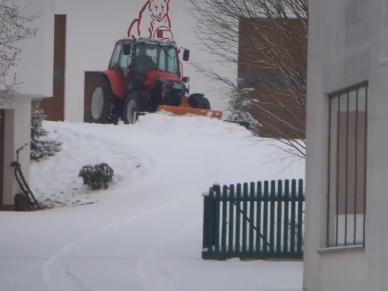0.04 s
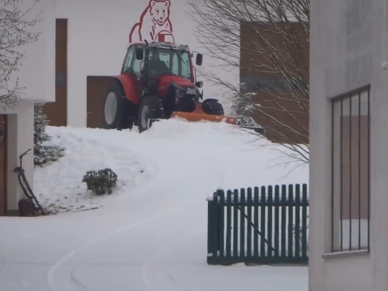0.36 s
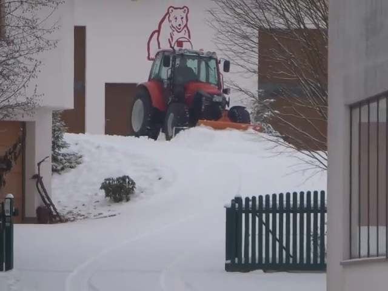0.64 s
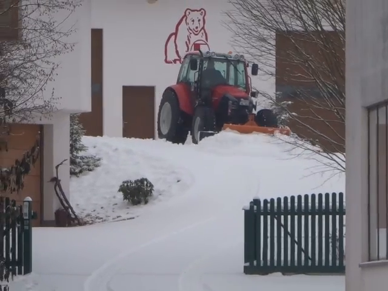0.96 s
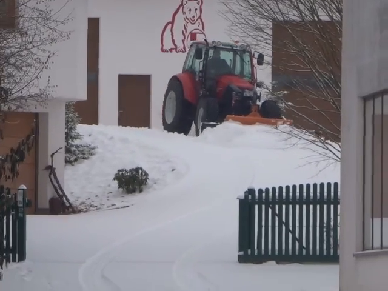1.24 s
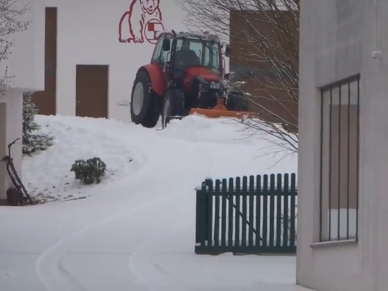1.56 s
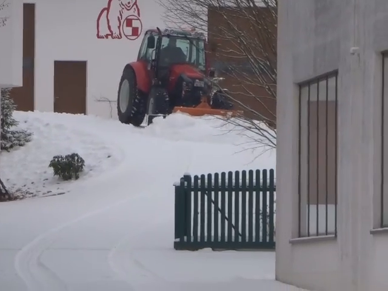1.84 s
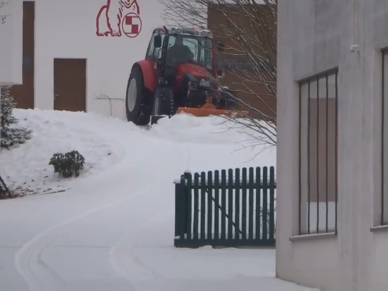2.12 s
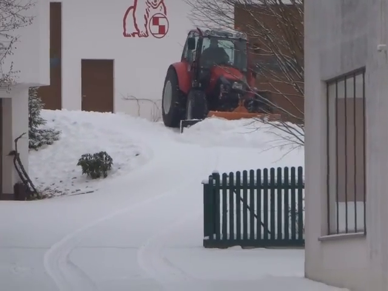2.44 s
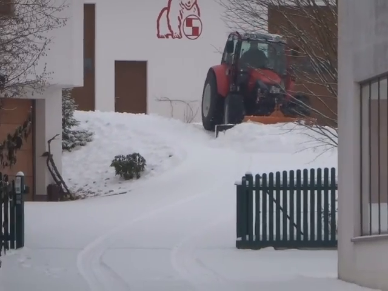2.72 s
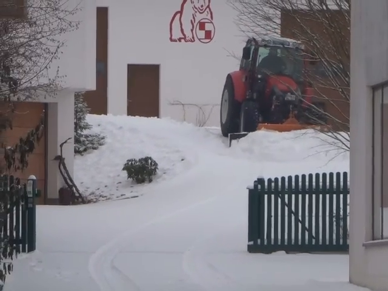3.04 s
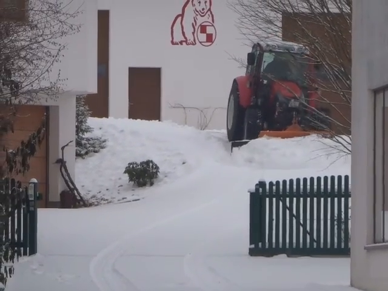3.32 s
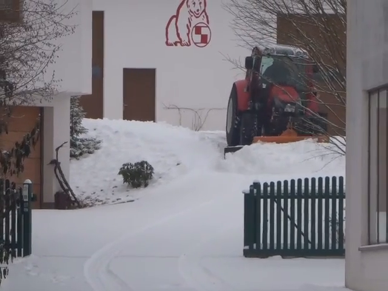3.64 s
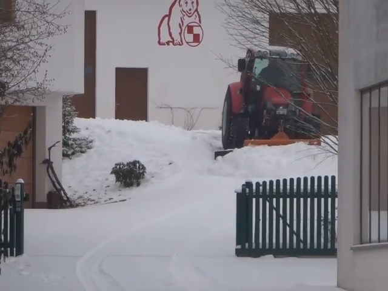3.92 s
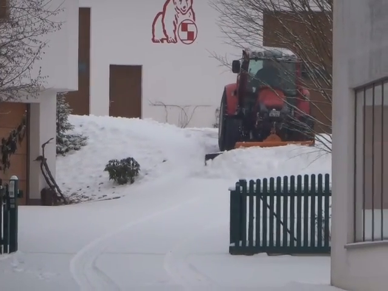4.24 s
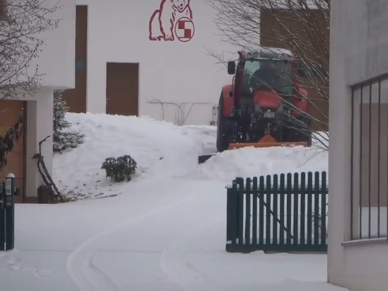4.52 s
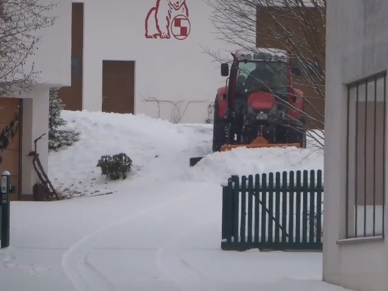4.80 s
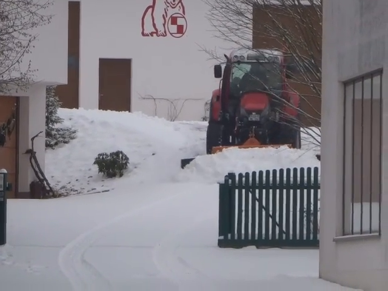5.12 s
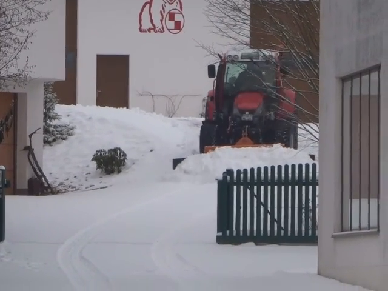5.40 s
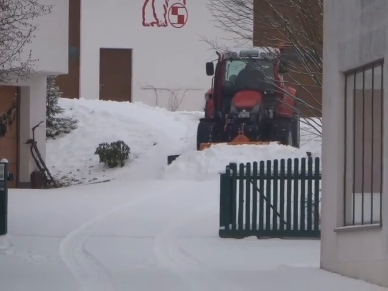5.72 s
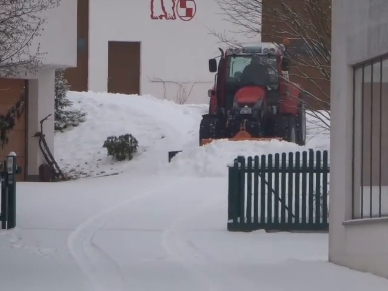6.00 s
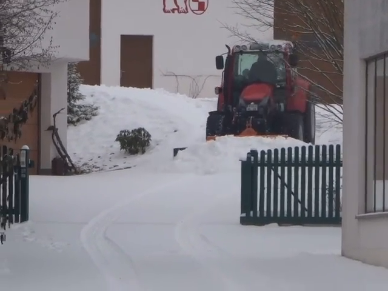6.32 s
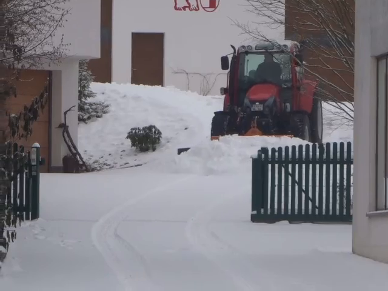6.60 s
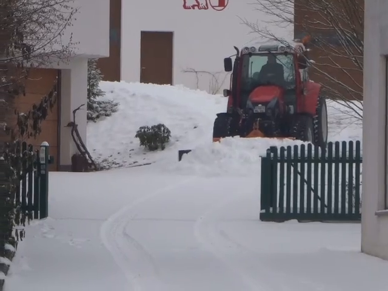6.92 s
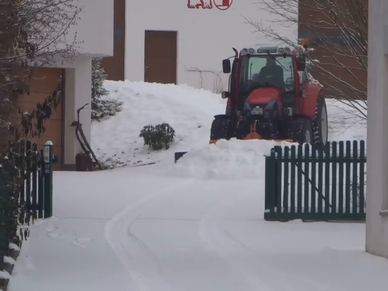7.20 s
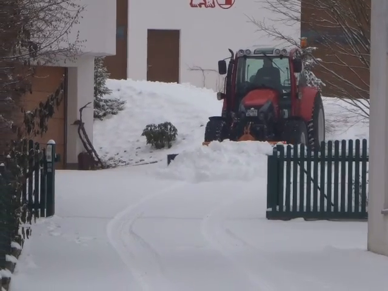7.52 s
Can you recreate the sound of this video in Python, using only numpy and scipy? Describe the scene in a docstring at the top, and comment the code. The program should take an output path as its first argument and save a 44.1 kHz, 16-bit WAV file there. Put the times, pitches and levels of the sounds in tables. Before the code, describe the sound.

A tractor pushes snow along a driveway with a steel blade, its diesel running slowly underneath. The scraping starts loud and bright, with crunching, hissing and a dull tumble of snow. Wind puffs begin to thump on the microphone and frozen lumps knock on the blade. The edge rasps on the paving in a second surge, then the scraping drops to a quieter rush with faint squeaks and a brief exhaust boom.

```python
"""A tractor pushes snow down a driveway with a steel blade; its diesel runs slowly underneath.
0-2.5 s: loud, bright scraping. The edge sticks and slips; the heap groans, crunches, tumbles at 1.2 s.
From 2.5 s: wind puffs thump on the microphone and frozen lumps knock on the blade.
3.2-4.5 s: the edge bites through to the paving and the scraping surges once more, then eases.
Faint steel squeaks at 5 s, a brief exhaust boom at 6.5 s, a last squeak at 7.2 s."""
import sys
import numpy as np
from scipy import signal
from scipy.fft import rfft, irfft, next_fast_len
from scipy.io import wavfile
from scipy.ndimage import uniform_filter1d, map_coordinates

SR = 44100
rng = np.random.default_rng(int(sys.argv[2]) if len(sys.argv) > 2 else 0)


def store_pcm(level_fs):
    """Save levels as 16-bit WAV."""
    pcm = np.round(np.clip(level_fs, -1, 1) * 32767).astype(np.int16)
    wavfile.write(sys.argv[1], SR, np.atleast_2d(pcm).T)


N = 341775

# Blade at work: (time [s], grind level [dB], loose-snow hiss level [dB])
BLADE_LEVELS = [(0.1, -24.9, -25.5), (0.4, -20.5, -24.5), (0.75, -21.5, -21.5), (1.03, -20.5, -22),
                (1.2, -20.5, -24.5), (1.5, -19.5, -22.5), (2.0, -18.5, -23.0), (2.2, -20, -26.5),
                (2.7, -19, -30.5), (3.05, -24, -35.8), (3.35, -27, -36.5), (3.75, -22, -34.5),
                (4.3, -23, -33.5), (4.75, -33, -40.5), (5.5, -33, -39), (6.3, -34.6, -42.5),
                (7.1, -36.0, -43.5), (7.45, -37.0, -45.4), (7.75, -37.5, -45.1)]
# Fine spray: (time [s], level relative to hiss [dB])
SPRAY_OVER_HISS = [(.4, -9.5), (1.2, -6.5), (2, -7), (3.3, -10.5), (3.85, -13.5), (4.15, -8), (6.6, -8.5),
                   (7.1, -5), (7.5, -13)]
# Scrape brightness: (time [s], upper over lower band [dB])
GRIND_TILT = [(.4, -1), (.8, 1.5), (2.2, 1.5), (3.35, -3), (3.85, 5), (4.3, 6.5), (6.6, 1.5), (7.5, -3.5)]
RASP_TILT = [(.4, -10), (.75, 2.5), (1.2, -8), (1.7, -2), (2.2, -7), (3.1, 8), (4.3, -2.5), (6.1, 13),
             (7.75, 2)]
# Scrape spectra: (frequency [Hz], density [dB])
GROAN_SPECTRUM = [(60, -26), (170, -16), (255, -6.5), (325, 0.5), (400, -3), (490, -7.5), (700, -12),
                  (1500, -48)]
GRIND_SPECTRUM = [(250, -36), (460, -5), (560, -5.5), (680, -1.5), (860, 2), (1250, 0), (1550, -2),
                  (1850, -5.5), (2600, -19), (6000, -58)]
RASP_SPECTRUM = [(900, -64), (1550, -7.5), (1950, 0), (2250, 0), (2650, -4), (3050, -12), (4200, -40),
                 (9000, -60)]
HISS_SPECTRUM = [(1800, -41), (2700, -3.5), (3300, 2.5), (4000, 2), (4700, -3.5), (5600, -3.5),
                 (6600, -15.5), (8000, -11.5), (11000, -45)]
SPRAY_SPECTRUM = [(4000, -25), (6000, 5), (7200, 1), (8400, -0.5), (9300, -4.5), (10200, -5.5),
                  (11200, -14.5)]
TUMBLE_SPECTRUM = [(70, -25), (125, -5), (175, 0), (280, 2.5), (420, 2.5), (570, 2), (750, -5), (1500, -45)]
# Steel blade resonances: (frequency [Hz], width [Hz], level [dB])
BLADE_MODES = [(680, 134, -5.5), (883, 210, -28), (1120, 57, -31), (1620, 420, -3), (2060, 780, -18)]
# Edge on paving: (start [s], end [s], rasp boost [dB])
EDGE_BITES = [(0.075, 0.42, 5.5), (3.21, 3.503, 4.5), (3.5, 4.447, 8), (4.7, 5.65, 2), (7.149, 7.8, 3)]
# Heap shoved into a tumble: (time [s], level [dB], half length [s])
HEAP_SHOVES = [(1.23, -23, 0.3), (3.219, -34, 0.11)]
# Lumps caught by the edge: (time [s], relative level [dB], crack offset [dB])
LUMP_HITS = [(2.845, -10, -21), (2.876, -24, -16), (3.217, -3, -28), (3.874, -5, -24), (4.042, -7, -26),
             (4.366, -9, -20), (5.752, -12, -22)]
# Steel squeaks: (time [s], level [dB], half length [s])
STEEL_SQUEAKS = [(5.02, -52, 0.038), (7.24, -57, 0.038)]
# Diesel: (time [s], firing rate [Hz], relative level [dB])
ENGINE_RUN = [(0, 40, -40), (.8, 64, -39.5), (1.3, 36, -34), (2, 38, -39.5), (3.2, 34.6, -34.5),
              (4.5, 43.3, -46.5), (6.3, 37, -44), (6.65, 37, -44.5), (7, 41, -49), (7.75, 33.5, -45)]
# Exhaust drone: (multiple of firing rate, level [dB])
EXHAUST_HARMONICS = [(1, -3), (2, -1.5), (3, 0), (4, -1.5), (5, -10.5), (6, -12)]
# Exhaust boom at twice the firing rate: (time [s], relative level [dB])
EXHAUST_BOOM = [(6.49, -10), (6.55, 16), (6.75, 13), (6.85, -8)]
# Engine panel resonances: (frequency [Hz], width [Hz], level [dB])
PANEL_MODES = [(560, 69, -2), (675, 75, -3.5), (1110, 160, 0), (1276, 98, -6), (1544, 240, -2.5),
               (2200, 260, -6)]
# Eddies on the microphone: (time [s], level [dB], hold [s], pitch [Hz])
EDDIES = [(2.556, -27.5, 0.011, 120), (2.831, -25.5, 0.033, 105), (3.129, -22, 0.0099, 114),
          (3.361, -23, 0.012, 120), (3.446, -21.5, .005, 105), (3.625, -29.5, 0.0039, 80),
          (3.708, -24.5, 0.0037, 80), (3.886, -27, 0.08, 124.2), (3.998, -21, 0.057, 131.8),
          (4.132, -22, 0.0086, 87), (4.168, -20.5, 0.022, 114), (4.226, -18.5, .007, 71.8),
          (4.945, -17.5, .008, 90.5), (4.987, -22, 0.033, 138), (5.182, -21.5, 0.018, 145.5),
          (6.134, -26, 0.023, 145), (6.793, -25, 0.017, 119.7), (6.955, -21, 0.023, 145),
          (7.152, -18.5, .001, 170), (7.233, -23, 0.007, 109.8)]
# Slow wind swells: (time [s], level [dB], half length [s])
WIND_GUSTS = [(1.22, -37, .36), (2.2, -39, .08), (2.8, -37.5, 0.29)]
# Wind rumble: (frequency [Hz], density [dB])
WIND_SPECTRUM = [(15, -22), (35, 0.5), (65, -6.5), (110, 3.5), (165, -0.5), (230, -13), (400, -14),
                 (900, -64)]
# Echo off packed snow: (time [s], strength [0-1])
GROUND_ECHO = [(2.9, 0.38), (3.35, 0.36), (3.8, 0.46), (4.3, 0.4), (4.8, 0.13)]
# Packed snow shapes the finest spray: (time [s], top-band gain [dB])
TOP_GAIN = [(.42, -13), (.9, -3), (1.3, 5), (2.2, 5.5), (4, 2), (5.2, 5), (7.5, 1)]
# Reach of that gain: (frequency [Hz], share [0-1])
TOP_SHARE = [(8000, 0.012), (9200, 0.55), (11000, 1)]
# Tractor direction: (time [s], treble L-R [dB])
TRACTOR_PAN = [(0.95, -3.5), (1.45, 3), (2.15, 6), (5.85, 7), (7.3, 5.5)]
# Camera body shadow: (frequency [Hz], pan multiplier)
BODY_SHADOW = [(200, 0.14), (450, 0.094), (1000, 0.58), (2200, 1), (4500, 1.12), (9000, 2.02)]
# Duller left microphone port: (frequency [Hz], L-R [dB])
PORT_BALANCE = [(4500, -0.5), (8000, -6)]
# Stereo likeness of the tractor: (frequency [Hz], L-R correlation [0-1])
COHERENCE = [(100, 1), (400, 0.96), (1000, 0.94), (2200, 0.91), (4500, 0.9), (9000, 0.86)]


def plough(groan_follows_grind=0.27, unload_db_per_db=0.18, settle_s=0.85):
    """The edge sticks and slips; each slip crushes snow in all bands at once."""
    grind_db, hiss_db = curves(BLADE_LEVELS)
    fine_db, = curves(SPRAY_OVER_HISS)
    bite_db = edge_bite()
    groan_db = hiss_db + groan_follows_grind * (grind_db - hiss_db) - 5 - unload_db_per_db * bite_db
    rasp_db = hiss_db + 1.9 + bite_db
    groan_tilt_db = -2.5 + 12 * np.exp(-clock() / settle_s)  # starts high, settles lower
    grind_tilt_db, = curves(GRIND_TILT)
    rasp_tilt_db, = curves(RASP_TILT)
    hiss_tilt_db = 0.76 * (fine_db + 8)  # more spray, finer hiss
    slip = unit(0.76 * wobble(20) + 1.1 * wobble(60) + 0.3 * wobble(190))
    groan = on_blade(GROAN_SPECTRUM, crunch(rate_hz=500, spread_db=2, share=0.28))
    groan = tilted(groan, groan_tilt_db, pivot_hz=290)
    grind = on_blade(GRIND_SPECTRUM, crunch(rate_hz=1200, spread_db=2, share=0.29), ring=0.82)
    grind = tilted(grind, grind_tilt_db, pivot_hz=1060)
    rasp = on_blade(RASP_SPECTRUM, crunch(rate_hz=1500, spread_db=2.5, share=0.33), ring=0.23)
    rasp = tilted(rasp, rasp_tilt_db, pivot_hz=2310)
    hiss = on_blade(HISS_SPECTRUM, crunch(rate_hz=2600, spread_db=1.5, share=0.16))
    hiss = tilted(hiss, hiss_tilt_db, pivot_hz=4300)
    spray = on_blade(SPRAY_SPECTRUM, crunch(rate_hz=4200, spread_db=2.5, share=0.44))
    tumble = on_blade(TUMBLE_SPECTRUM, crunch(rate_hz=300, spread_db=0.5, share=0.28))
    tumble *= swells(HEAP_SHOVES)
    heavy = amp(groan_db) * groan + amp(grind_db - 0.52) * grind + amp(rasp_db) * rasp + tumble
    loose = amp(hiss_db - 0.22) * hiss + amp(hiss_db + fine_db + 0.74 * wobble(45)) * spray
    return amp(0.48 * slip) * heavy + amp(0.68 * slip) * loose


def edge_bite(attack_s=0.19, release_s=0.29):
    """Rasp boost [dB]: the edge catches the paving, holds, lets go."""
    t = clock()
    return np.max([db * np.clip(np.minimum((t - start_s) / attack_s, 1 - (t - end_s) / release_s), 0, 1)
                   for start_s, end_s, db in EDGE_BITES], axis=0)


def crunch(rate_hz, spread_db, share):
    """Snow crystals break: uneven fractures carry a share of the power, a smooth rush the rest."""
    breaks = (rng.random((2, N)) < rate_hz / SR) * noise_pair() * amp(spread_db * noise_pair())
    return np.sqrt(share) * unit(breaks) + np.sqrt(1 - share) * noise_pair()


def on_blade(spectrum, excitation, ring=0.1):
    """Stereo excitation shaped by a spectrum and lifted at the blade's resonances."""
    colour = lambda hz: amp(along(spectrum, hz)) * (1 + ring * resonances(BLADE_MODES, hz))
    return stereo(excitation, colour, COHERENCE)


def crackle(rate_hz=35, decay_s=0.00052):
    """Bits of crust snap at random, following the hiss level."""
    _, hiss_db = curves(BLADE_LEVELS)
    snaps = (rng.random(N) < rate_hz / SR) * amp(2.1 * rng.standard_normal(N))
    bursts = signal.lfilter([1], [1, -np.exp(-1 / (decay_s * SR))], snaps)
    crust = on_blade([(900, -19), (2000, -18), (3200, -1), (5000, -2), (11000, -31)], noise_pair(), 0.2)
    return amp(hiss_db - 11) * unit(bursts * crust)


def lumps(rise_s=0.00055, knock_t60_s=0.035, crack_t60_s=0.017):
    """Frozen lumps knock on the blade and crack; snow damps the ring at once."""
    knock_gain, crack_gain = np.zeros(N), np.zeros(N)
    for at_s, db, crack_db in LUMP_HITS:
        age_s = clock() - at_s
        onset = np.clip(age_s / rise_s, 0, 1)
        knock_gain += onset * amp(db - 10 - 60 * abs(age_s) / knock_t60_s)
        crack_gain += onset * amp(db + crack_db - 16 - 60 * abs(age_s) / crack_t60_s)
    knock = on_blade([(300, -38), (900, 14), (2200, 13), (5000, -20), (11000, -67)], noise_pair(), 1.9)
    crack = on_blade([(1000, -25), (3200, 13), (6000, -9), (11000, -29)], noise_pair())
    return knock_gain * knock + crack_gain * crack


def squeaks(pitch_hz=8950, width_hz=130):
    """Rubbing steel: a faint, narrow whistle."""
    band = lambda hz: np.exp(-((hz - pitch_hz) / width_hz) ** 2)
    return swells(STEEL_SQUEAKS) * stereo(noise_pair(), band, COHERENCE)


def diesel():
    """Uneven firings drone in the exhaust; each rattles the engine panels."""
    firing_hz, level_db = curves(ENGINE_RUN)
    boom_db, = curves(EXHAUST_BOOM)
    phase = 2 * np.pi * np.cumsum(firing_hz * (1 + 0.0095 * wobble(9))) / SR
    drone = unit(sum(amp(db + 3.2 * wobble(3.2)) * np.sin(k * phase) for k, db in EXHAUST_HARMONICS))
    boom = amp(boom_db - 6) * np.sin(2 * phase)
    panels = stereo(noise_pair(), lambda hz: resonances(PANEL_MODES, hz), COHERENCE)
    rattle = unit(np.exp(0.16 * np.cos(phase)) * panels)
    return amp(level_db - 4) * (drone + boom) + amp(-40.5) * rattle


def wind_rumble(calm_db=-50, wake_offset_db=-17.5, wake_half_s=0.076):
    """Wind on the microphone ports; swells in gusts and around each eddy."""
    gusts = swells(WIND_GUSTS)
    wakes = swells((at_s + hold_s / 2, db + wake_offset_db, wake_half_s)
                   for at_s, db, hold_s, _ in EDDIES)
    rumble = stereo(noise_pair(), lambda hz: amp(along(WIND_SPECTRUM, hz)), [(40, 0.9), (160, 0.43)])
    return np.sqrt(amp(calm_db) ** 2 + gusts ** 2 + wakes ** 2) * amp(2.5 * wobble(22)) * rumble


def wind_puffs():
    """Eddies hit the microphone and flutter out in uneven cycles; longer ones rise and die slower."""
    out = np.zeros((2, N))
    warped_s = np.cumsum(np.exp(0.35 * wobble(260))) / SR
    flutter = amp(2.3 * wobble(90))
    for at_s, db, hold_s, hz in EDDIES:
        start_rad = rng.uniform(0, 2 * np.pi)
        skew_rad = rng.normal(0.6, 0.2)  # one port is reached first
        near = abs(clock() - at_s) < 0.25
        age_s = clock()[near] - at_s
        attack_s, decay_s = 0.0045 + 0.17 * hold_s, 0.0083 + 0.44 * hold_s
        rise = np.exp(-(age_s / attack_s) ** 2)
        fall = np.exp(-np.maximum(age_s - hold_s, 0) / decay_s)
        envelope = np.where(age_s < 0, rise, fall)
        phase = 2 * np.pi * hz * warped_s[near] + start_rad + np.array([[skew_rad], [-skew_rad]])
        # larger and smaller whirls ride along
        whirls = 0.45 * np.sin(0.48 * phase) + np.sin(phase) + 0.45 * envelope * np.sin(1.8 * phase)
        out[:, near] += amp(db + 0.7) * envelope * flutter[near] * whirls
    return out


def air():
    """Deep, steady outdoor rumble."""
    spectrum = [(15, -28), (35, -9.5), (55, -7.5), (85, -10), (200, -17), (600, -50)]
    gain = amp(-46 + 2.4 * wobble(4.2))
    return gain * stereo(noise_pair(), lambda hz: amp(along(spectrum, hz)), [(40, 0.98), (160, 0.83)])


def ground_echo(x, delay_s=0.000517):
    """A grazing echo off the snow arrives inverted and hollows the sound."""
    strength, = curves(GROUND_ECHO)
    bounce = lambda hz: np.exp(-2j * np.pi * hz * delay_s) * hz / (hz + 700) / (1 + (hz / 7000) ** 4)
    return x - strength * filtered(x, bounce)


def yard(x, patch_db=0.8):
    """Shifting snow and wall reflections recolour the tractor; the camera body shades the far side."""
    hz, t, bins = signal.stft(x, SR, nperseg=512)
    patches = uniform_filter1d(rng.standard_normal(bins.shape[1:]), size=5, axis=0)
    patches = unit(uniform_filter1d(patches, size=14, axis=1))
    top_db = along(TOP_SHARE, hz)[:, None] * np.interp(t, *np.transpose(TOP_GAIN))
    pan_db = along(BODY_SHADOW, hz)[:, None] * np.interp(t, *np.transpose(TRACTOR_PAN))
    pan_db += along(PORT_BALANCE, hz)[:, None]
    sides = amp(np.array([pan_db, -pan_db]) / 2)
    coloured = bins * amp(top_db + patch_db * patches) * sides / sides.mean(axis=0)
    return signal.istft(coloured, SR, nperseg=512)[1][:, :N]


def amp(db):
    """dB to gain."""
    return 10 ** (np.asarray(db) / 20)


def unit(x):
    """Scale to rms 1."""
    return x / np.sqrt(np.mean(x ** 2) + 1e-20)


def clock():
    """Sample times [s]."""
    return np.arange(N) / SR


def noise_pair():
    """Two independent white noises."""
    return rng.standard_normal((2, N))


def along(points, hz):
    """Interpolate (frequency [Hz], value) on a log axis."""
    knots_hz, values = np.transpose(points)
    return np.interp(np.log(hz + 1), np.log(knots_hz + 1), values)


def curves(rows):
    """Per-sample curve for each column after time [s]."""
    times_s, *columns = np.transpose(rows)
    return [np.interp(clock(), times_s, column) for column in columns]


def swells(rows):
    """Bell-shaped gains from (time [s], level [dB], half length [s])."""
    return sum(amp(db) * np.exp(-((clock() - at_s) / half_s) ** 2) for at_s, db, half_s in rows)


def wobble(rate_hz):
    """Smooth random curve, rate_hz knots a second."""
    return map_coordinates(rng.standard_normal(int(N * rate_hz / SR) + 4), [clock() * rate_hz])


def resonances(modes, hz):
    """Summed peaks from (frequency [Hz], width [Hz], level [dB])."""
    return sum(amp(db) / (1 + (2 * (hz - peak_hz) / width_hz) ** 2) for peak_hz, width_hz, db in modes)


def filtered(x, response):
    """Apply a frequency response."""
    size = next_fast_len(N + SR // 2)
    return irfft(rfft(x, size) * response(np.fft.rfftfreq(size, 1 / SR)), size)[..., :N]


def tilted(x, tilt_db, pivot_hz):
    """Shift weight across a pivot at roughly constant power."""
    low = filtered(x, lambda hz: 1 / (1 + (hz / pivot_hz) ** 8))
    down, up = amp(-tilt_db / 2), amp(tilt_db / 2)
    return (down * low + up * (x - low)) / np.sqrt((down ** 2 + up ** 2) / 2)


def stereo(pair, colour, coherence):
    """Independent pair to coloured L/R, rms 1; coherence: (frequency [Hz], correlation)."""
    angle = lambda hz: np.arccos(np.clip(along(coherence, hz), -1, 1)) / 2
    mid, side = filtered(pair, lambda hz: colour(hz) * np.array([np.cos(angle(hz)), np.sin(angle(hz))]))
    return unit(np.array([mid + side, mid - side]))


def scene():
    """Tractor in the yard, wind at the microphone, outdoor rumble."""
    tractor = plough() + crackle() + lumps() + squeaks() + diesel()
    return yard(ground_echo(tractor)) + wind_rumble() + wind_puffs() + air()


def record(dry, open_s=0.082, fade_s=0.15, ceiling=0.9, cutoff_hz=11100):
    """Fade-in, soft peak limit, steep low-pass."""
    faded = dry * np.clip((clock() - open_s) / fade_s, 0, 1) ** 0.52
    rounded = faded / (1 + (faded / ceiling) ** 8) ** (1 / 8)
    return filtered(rounded, lambda hz: 1 / np.sqrt(1 + np.minimum(hz / cutoff_hz, 2) ** 600))


dry = scene()
out = record(dry)
store_pcm(out)
```